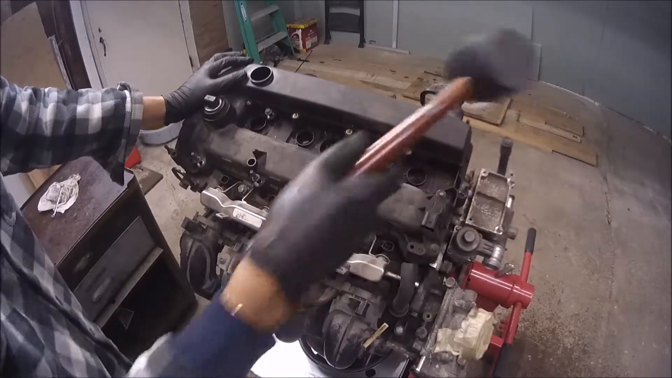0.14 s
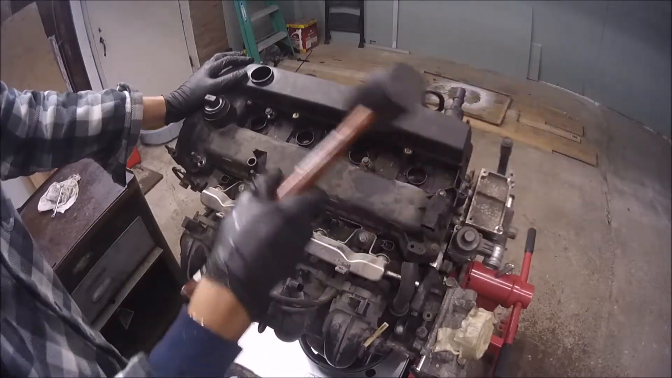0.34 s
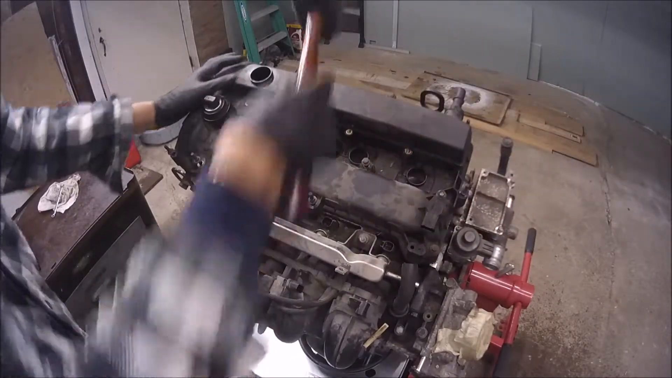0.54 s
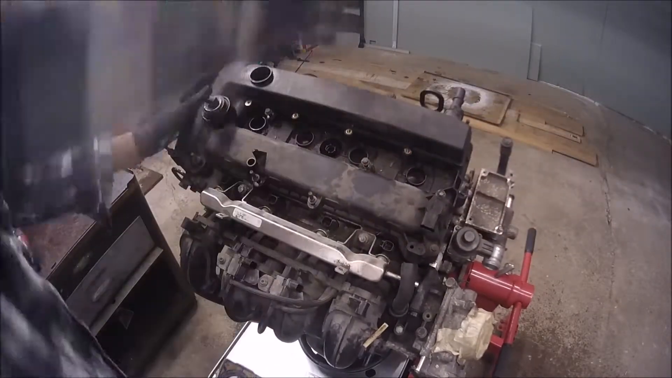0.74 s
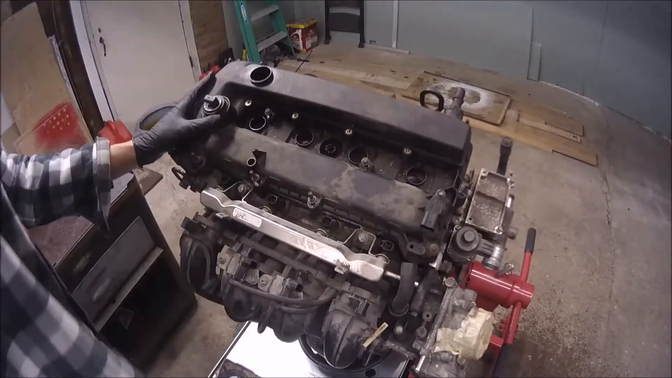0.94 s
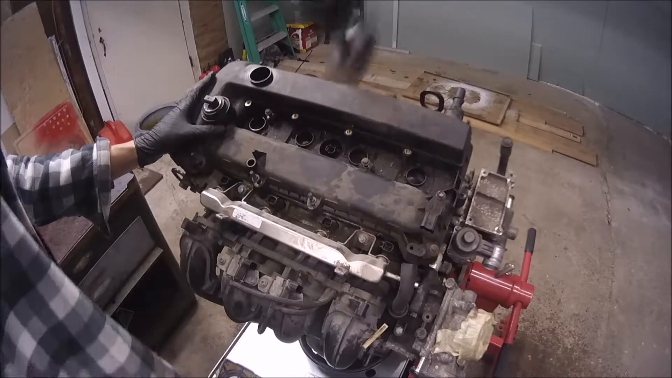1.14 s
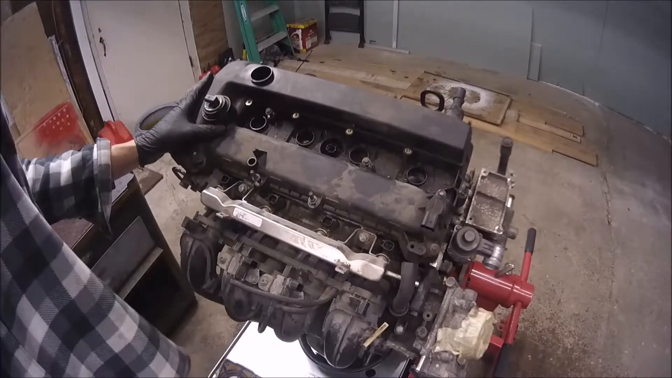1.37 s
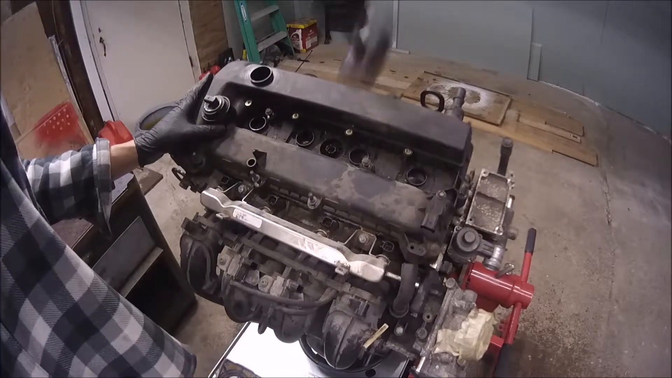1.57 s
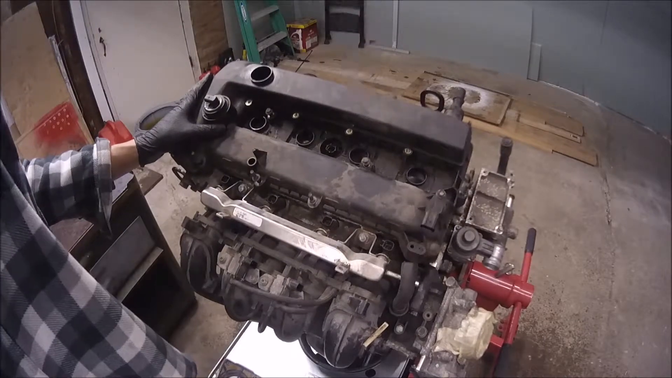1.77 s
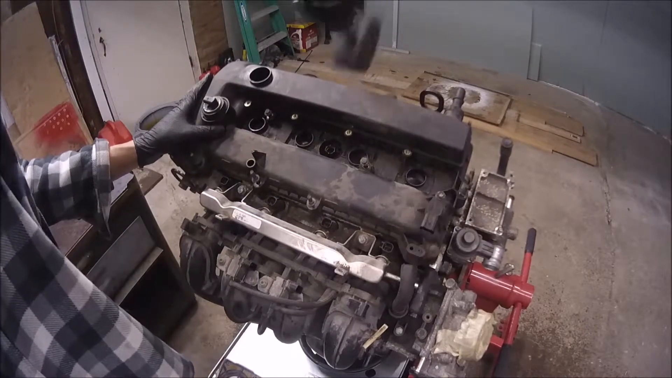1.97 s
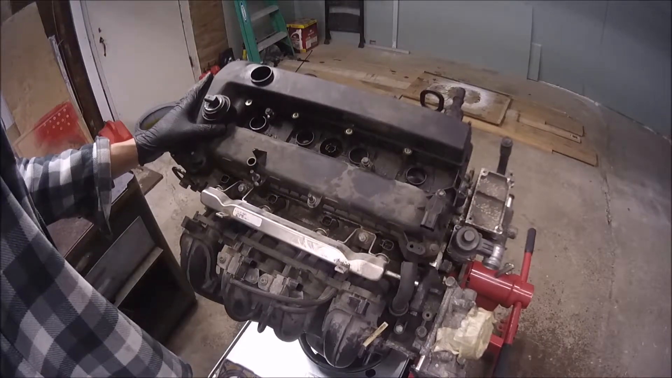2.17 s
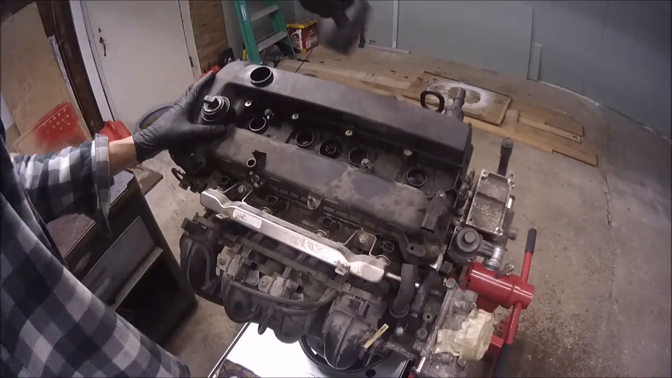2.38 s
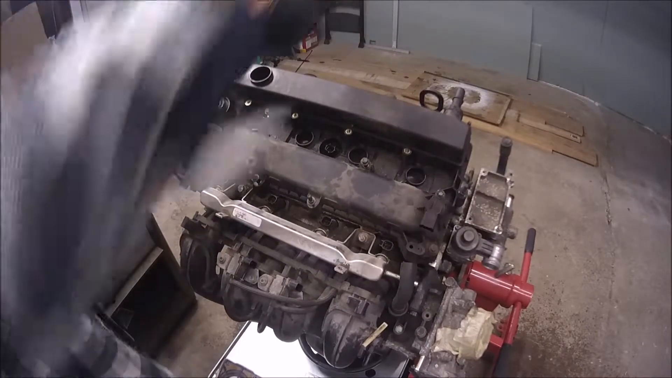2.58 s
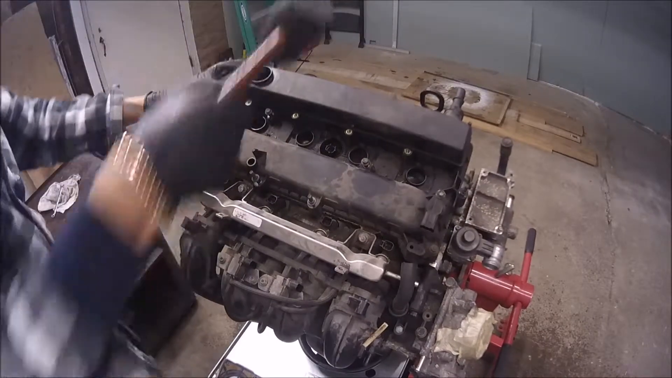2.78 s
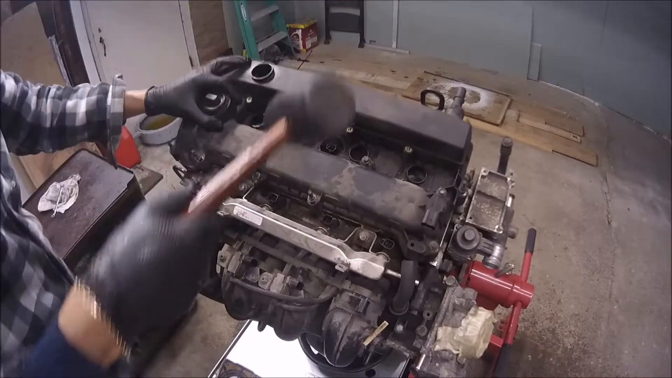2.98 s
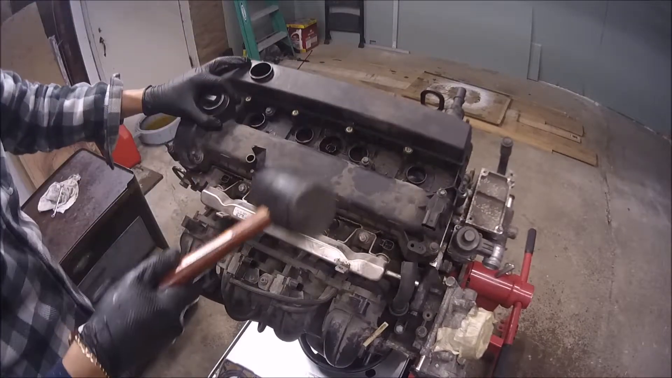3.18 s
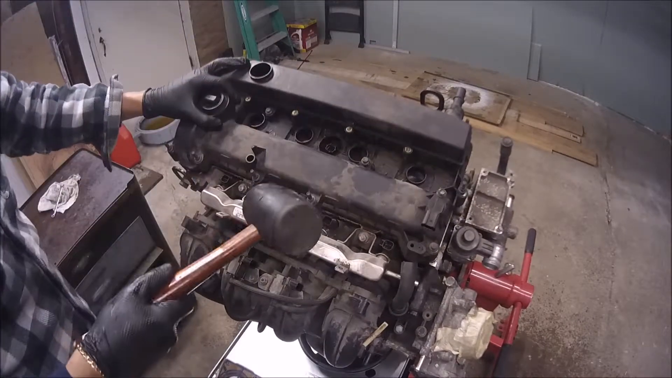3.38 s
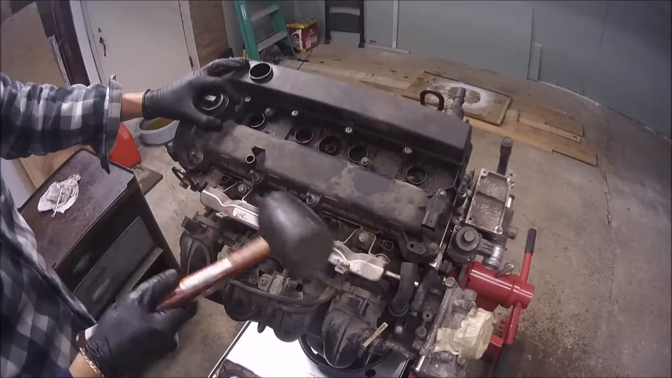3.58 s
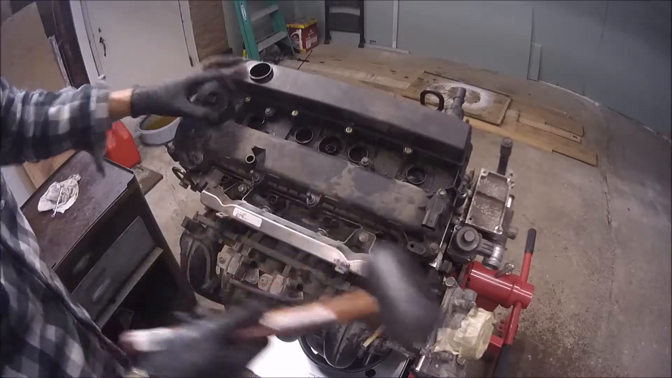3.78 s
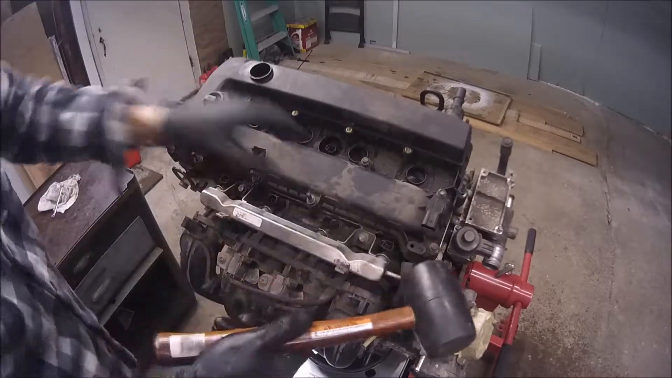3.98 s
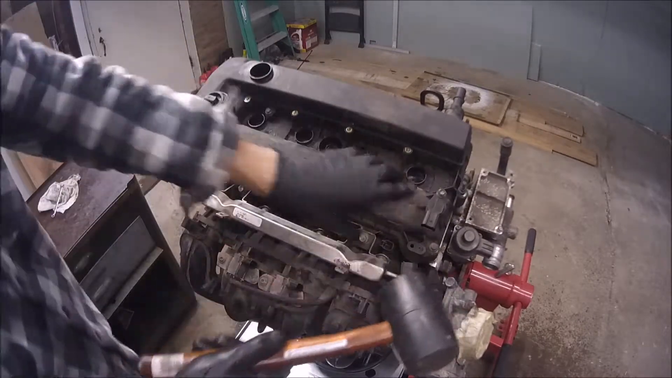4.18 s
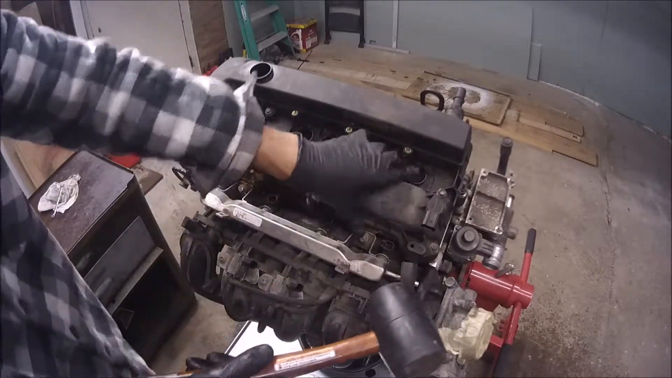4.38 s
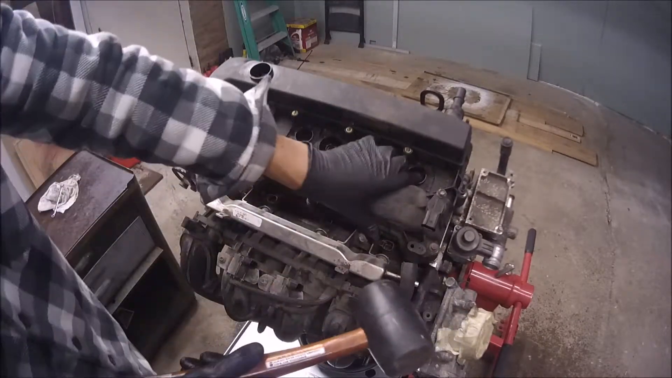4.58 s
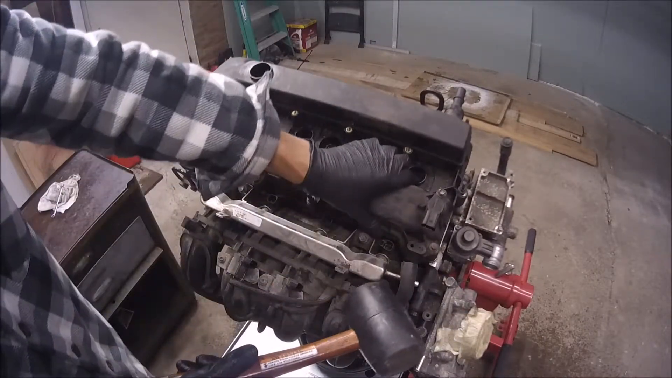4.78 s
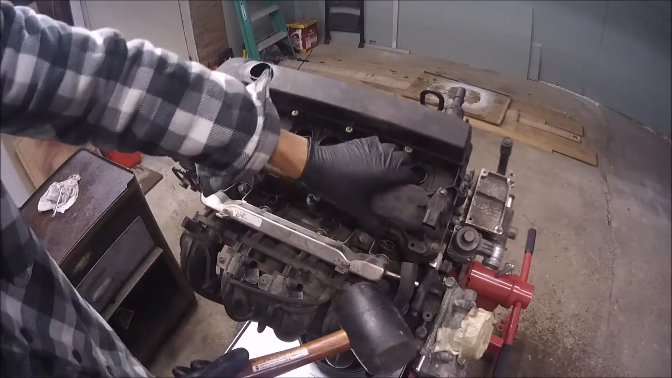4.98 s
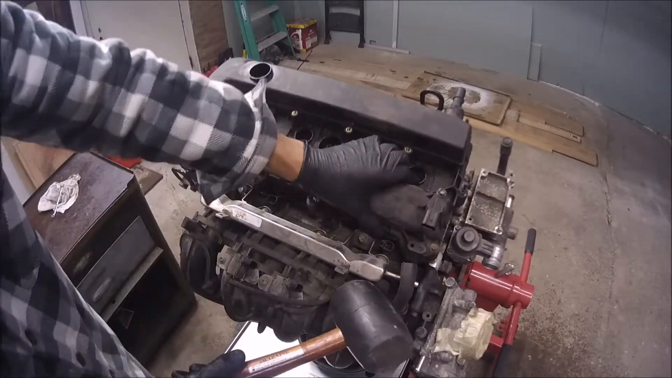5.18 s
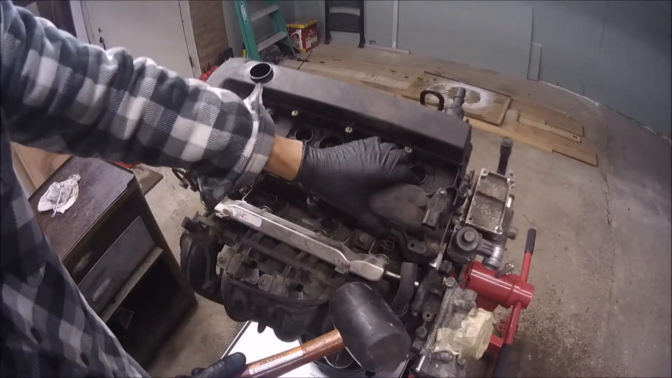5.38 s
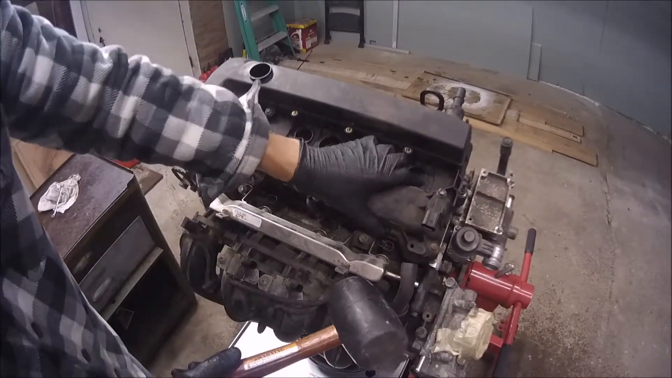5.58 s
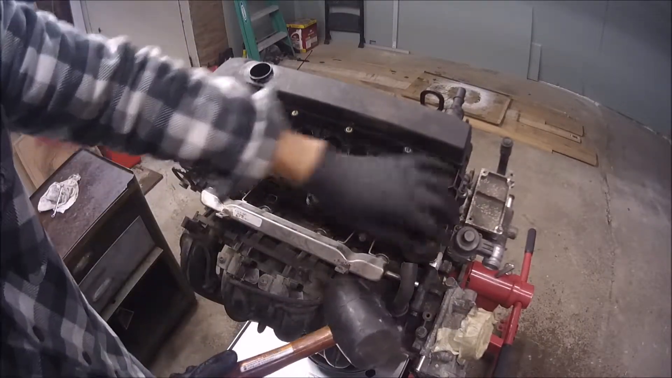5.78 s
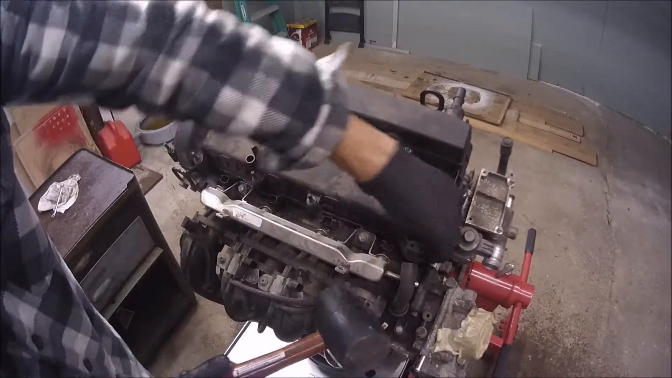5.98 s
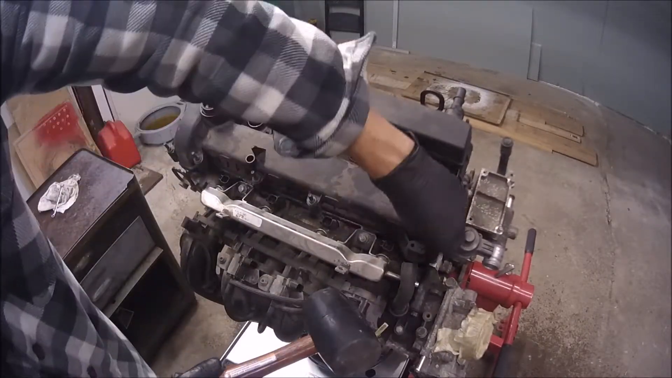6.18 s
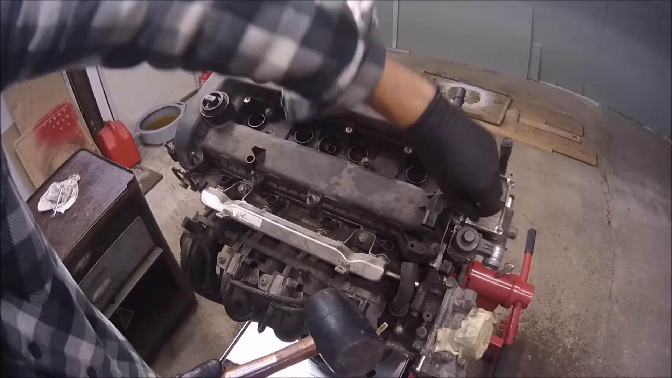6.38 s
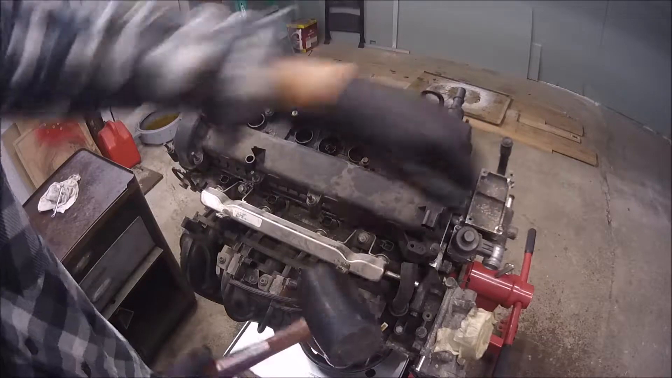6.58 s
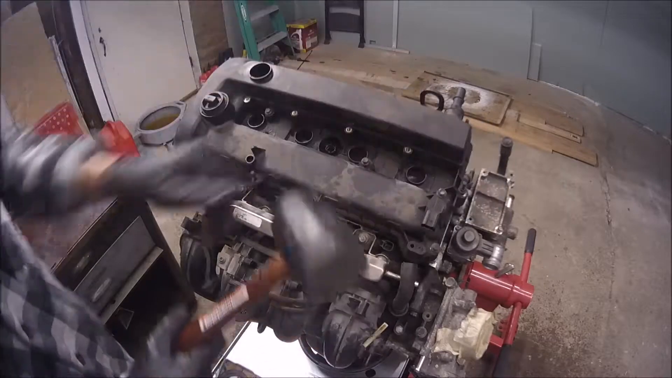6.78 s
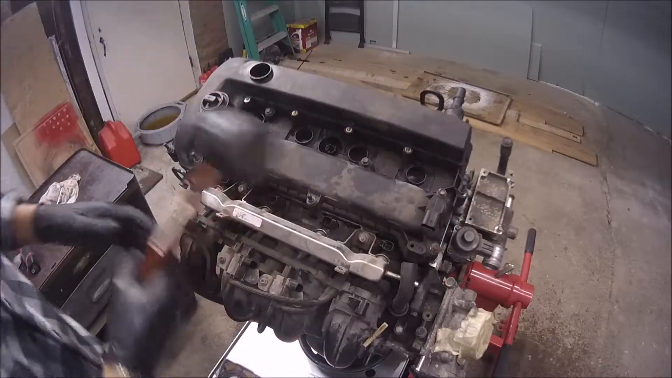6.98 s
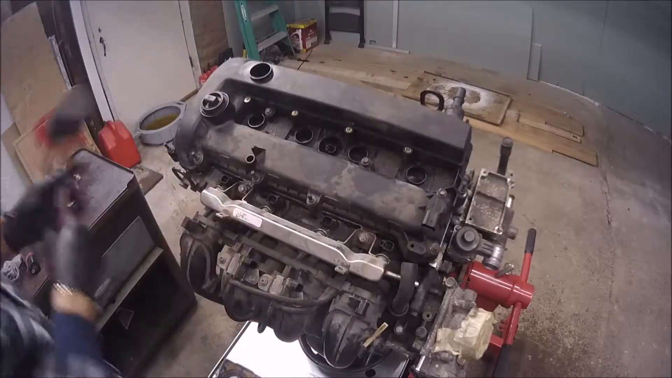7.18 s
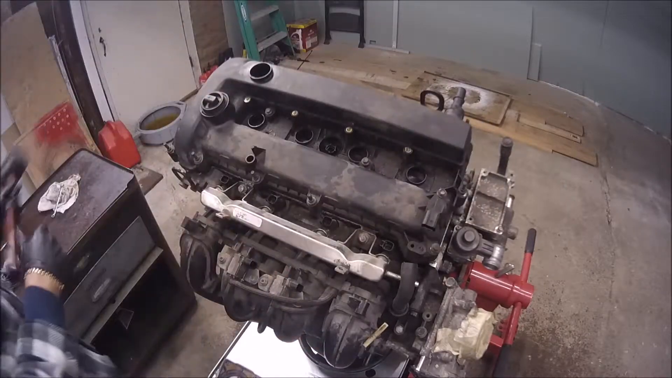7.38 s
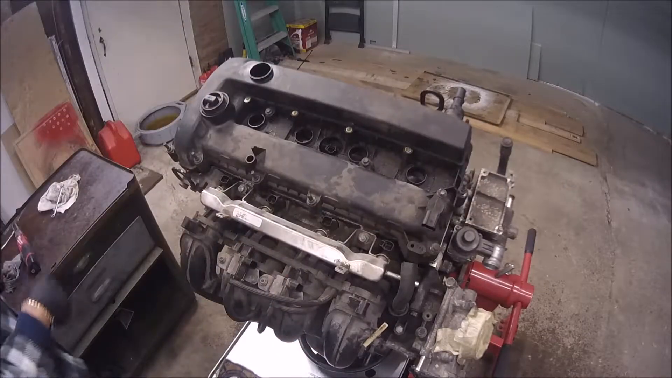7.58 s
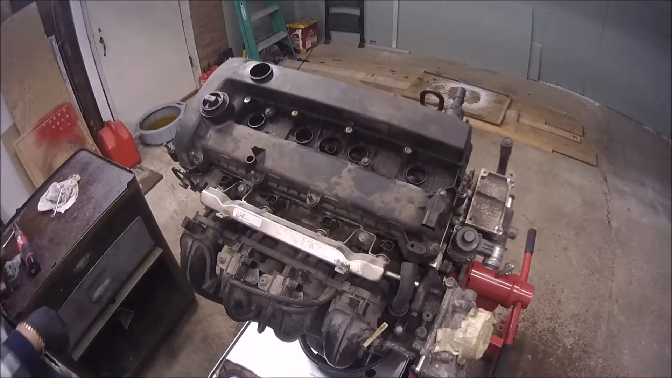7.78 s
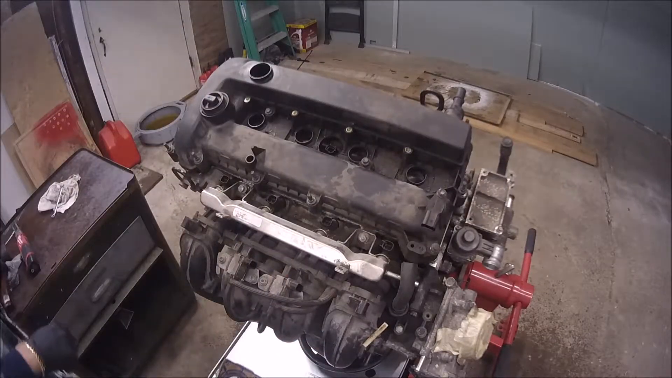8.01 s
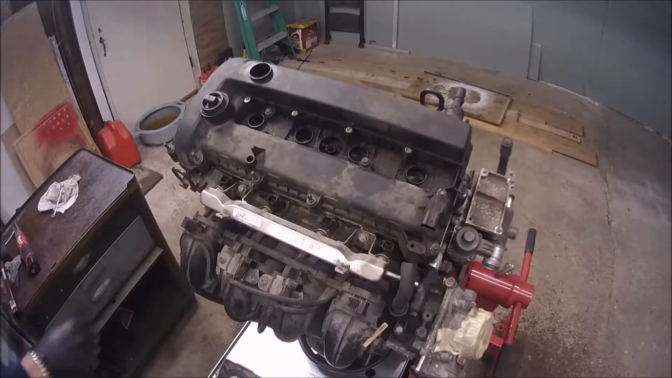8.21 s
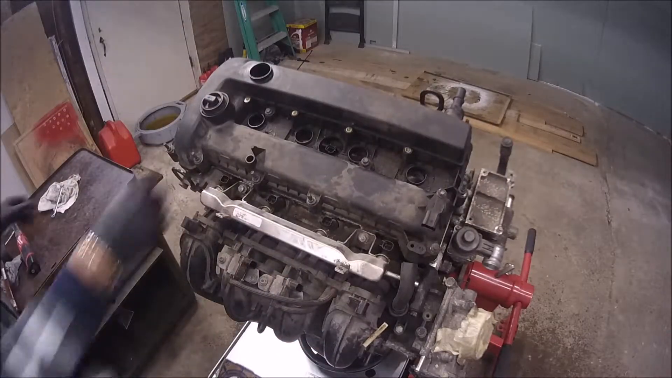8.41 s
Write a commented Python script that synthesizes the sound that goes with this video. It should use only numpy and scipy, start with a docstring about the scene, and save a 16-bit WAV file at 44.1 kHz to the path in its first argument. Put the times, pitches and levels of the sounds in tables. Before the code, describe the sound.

Close by in a bare, echoing garage, a rubber mallet strikes a metal engine cover four times in quick succession. Each blow thumps, rings and rattles, overloading the microphone. A sharp clack follows, then a gloved hand rocks the loosened cover, which clicks and clatters. Sleeves rustle softly, and the mallet is put down on a cabinet with a clunk.

```python
"""Mallet on a valve cover

A rubber mallet strikes an engine's metal valve cover four times, close by, in a bare garage. Each blow
thumps, rings the cover and rattles it on its seat, overloading the microphone and ducking its gain.
Then a gloved hand rocks the loosened cover, which clicks and clatters. Sleeves rustle, and the mallet
is put down on a cabinet with a clunk."""
import sys
import numpy as np
from scipy import signal
from scipy.fft import rfft, irfft, next_fast_len
from scipy.io import wavfile
from scipy.ndimage import uniform_filter1d, minimum_filter1d

SR = 44100
rng = np.random.default_rng(int(sys.argv[2]) if len(sys.argv) > 2 else 0)


def master_out(mix):
    """Clip the mix to full scale and print it as 16-bit PCM to the path in sys.argv[1]."""
    frames = np.transpose(np.atleast_2d(mix))
    ceiling = np.clip(frames, -1, 1)
    pcm = np.round(ceiling * 32767).astype(np.int16)
    wavfile.write(sys.argv[1], SR, pcm)


N = 372644
TIME = np.arange(N) / SR
AGE = TIME[:SR * 2 // 5]   # seconds since a contact

# Colour of the hiss bed. Each row: frequency in Hz, density in dB.
HISS_COLOUR = [(18, -58), (30, -30), (92, -15), (312, -11), (426, -7), (953, -4.5), (1110, -8.5),
               (1370, -7), (2190, -10), (6700, -14), (7830, -15), (15000, -15.5)]
# The garage's reverb. Each row: frequency in Hz, level in dB, t60 in seconds.
GARAGE_REVERB = [(60, -13.5, 0.4), (129, -10, 0.4), (276, -1.5, .6), (600, -1.5, 0.59), (1090, 0, 0.55),
                 (2520, -1, 0.61), (5000, -1, 0.57), (9700, -4, 0.43), (14000, -8.5, .26)]
# Colour of rubbing cloth. Each row: frequency in Hz, density in dB.
CLOTH_COLOUR = [(80, -10), (300, 4), (1500, 0.5), (3000, -0.5), (6500, -3), (9500, 2), (12000, -7.5),
                (16000, -11.5)]
# Fader curves for the sleeve (lifting the mallet, reaching for the cover, drawing back) and for a dull
# scrape at the cabinet. Each row: time in seconds, level in dB.
SLEEVE_LIFT = [(0.42, -61), (0.558, -51), (0.646, -55.5), (0.674, -40.5), (0.892, -60.5), (0.95, -52.5),
               (0.996, -64), (1.026, -54.5), (1.17, -60)]
SLEEVE_REACH = [(4.2, -70), (4.258, -40.5), (4.306, -55), (4.526, -51), (4.558, -68), (4.624, -52.5),
                (4.72, -61.5)]
SLEEVE_BACK = [(7.14, -73), (7.178, -57), (7.19, -47), (7.512, -65.5), (7.6, -65)]
CABINET_SCRAPE = [(7.74, -60), (7.766, -74), (7.782, -55), (7.922, -41.5), (8.1, -67), (8.18, -58)]
# Brief slips of the glove. Each row: midpoint in seconds, level in dB, pitch in Hz.
GLOVE_SLIPS = [(1.993, -34.5, 6020), (3.042, -41, 2000), (3.818, -44.5, 5000), (4.842, -44, 4100),
               (5.67, -43.5, 5500), (5.922, -44.5, 5074), (7.176, -46, 5700), (7.238, -48.5, 2610),
               (7.91, -40.5, 1900)]
# The cabinet's panel modes. Each row: frequency in Hz, level in dB.
CABINET_MODES = [(113, -2.5), (150, -2.5), (250, -4.5), (515, 1), (690, -28), (781, -15), (1730, -11)]
# Bumps on the cabinet. Each row: start in seconds, level in dB, contact cut-off in Hz.
CABINET_BUMPS = [(0.008, -31, 2500), (7.890, -35, 150), (7.899, -29, 120), (7.946, -34.5, 151),
                 (7.99, -37.5, 170), (8.07, -45.5, 202), (8.193, -37, 2000)]
# The mallet lands on the cabinet: start in seconds, level in dB, t60 in seconds, reverb send in dB.
MALLET_CLUNK = (8.1895, -16.5, 0.165, 7.5)
# Colour of that clunk. Each row: frequency in Hz, density in dB.
CLUNK_COLOUR = [(100, -15), (250, -15), (480, -2.5), (750, -0.5), (1050, -5), (1350, 1.5), (1750, -3),
                (2200, -7.5), (2700, -15.5), (4000, -18.5), (6000, -26), (10000, -28), (15000, -42)]
# The valve cover's modes. Each row: frequency in Hz, level in dB.
COVER_MODES = [(180, -17), (255, -18.5), (285, -14.5), (413, -16), (490, -14.5), (580, -5.5), (640, -10),
               (785, -10.5), (888, -9), (910, -4.5), (1055, -5.5), (1112, -5), (1281, -10), (1789, -11),
               (1874, -8), (2046, -10), (2198, -11.5), (2760, -8.5), (3720, -13), (3930, -11.5),
               (4525, -14.5), (5394, -11.5)]
# Mallet and cover knock on the engine. Each row: start in seconds, level in dB, pitch in Hz, crack in dB.
ENGINE_KNOCKS = [(0.008, -13, 310, -3), (0.012, -13, 1490, 0), (0.074, -23, 3850, -15),
                 (0.635, -33.5, 2170, -18), (0.661, -42, 317, -18), (2.784, -20, 2500, -4.5),
                 (3.0589, -3.5, 1160, -3.5), (3.067, -14.5, 4000, -2), (3.779, -39, 900, -11.5),
                 (3.869, -29.5, 1300, -7), (4.868, -31, 1190, -20), (4.883, -20.5, 1580, -7),
                 (4.895, -25, 573, -24), (4.9241, -21.5, 1150, -12.5), (5.0815, -34, 700, -23),
                 (5.1598, -29.5, 1650, -10), (5.2414, -29.5, 900, -8), (5.297, -29, 1240, -10),
                 (5.555, -31, 480, -17), (6.2359, -29.5, 1320, -11), (6.259, -12, 3100, -13),
                 (6.266, -17.5, 1080, -1.5), (6.2813, -7.5, 1012, -3.5), (6.3217, -11.5, 1085, 5)]
# The cover rocks. Each row: start in seconds, level in dB, seat pitch in Hz, crack in dB.
COVER_ROCKS = [(4.257, -21.5, 770, -16), (4.348, -22.5, 780, -25), (4.4319, -22.5, 806, -22),
               (5.5641, -19, 1060, -17), (5.933, -17, 1030, -8.5)]
# Thin, bright ticks, most in a downswing. Each row: start in seconds, level in dB.
BRIGHT_TICKS = [(0.764, -48), (0.784, -46), (1.179, -41.5), (1.201, -33.5), (1.209, -33), (1.6205, -25),
                (1.629, -21), (1.6454, -28), (4.742, -45.5)]
# A small steel part pings: start in seconds, level in dB, pitch in Hz, t60 in seconds.
STEEL_PING = (3.066, -20, 13140, .13)
# Colour of the cover's dense rattle on its seat. Each row: frequency in Hz, density in dB.
RATTLE_COLOUR = [(60, -31), (140, -6.5), (250, -8.5), (550, -3.5), (1050, 2.5), (1500, -3.5), (2100, -2.5),
                 (3200, -6.5), (5200, -7), (7000, -11.5), (9500, -6.5), (12000, -18.5), (16000, -26)]
# Mallet blows. Each row: start in seconds, level in dB, rattle t60 in seconds, relative thump in dB.
MALLET_BLOWS = [(1.2173, 16.5, 0.1, -11), (1.6534, 16, 0.1, -5.5), (2.0224, 15.5, .075, -18),
                (2.3307, 11.5, 0.081, -26.5)]


def from_db(db):
    """Decibels to gain."""
    return 10 ** (np.asarray(db) / 20)


def at_hz(points, hz, column=1):
    """One column of a table, read on a log-frequency axis."""
    points = np.array(points)
    return np.interp(np.log(hz + 1e-9), np.log(points[:, 0]), points[:, column])


def fade(t60, age=AGE):
    """Exponential decay, 60 dB down after t60 seconds."""
    return np.exp(-np.log(1000) * age / max(t60, 1e-3))


def noise(colour, size):
    """Coloured noise of rms 1."""
    length = next_fast_len(size)
    gains = from_db(at_hz(colour, np.fft.rfftfreq(length, 1 / SR)))
    x = irfft(rfft(rng.standard_normal(length)) * gains, length)[:size]
    return x / x.std()


def passed(x, hz, kind, order=2):
    """Causal Butterworth filter."""
    sos = signal.butter(order, np.clip(hz, 10, .45 * SR), kind, fs=SR, output="sos")
    return signal.sosfilt(sos, x + 1e-18)


def add(track, s, sound):
    """Drops a sound onto a track at s seconds."""
    start = max(round(s * SR), 0)
    track[start:start + len(sound)] += sound[:N - start]


def ring(modes, spread_db):
    """Struck modes, the high ones dying first; each contact point gives them new strengths and signs."""
    gains = from_db(spread_db * rng.standard_normal(len(modes))) * rng.choice([-1, 1], len(modes))
    return sum(gain * from_db(db) * np.sin(2 * np.pi * hz * AGE) * fade(.11 * (hz / 1000) ** -.4)
               for gain, (hz, db) in zip(gains, modes))


def burst(low_hz, high_hz, t60):
    """A noise hit, like a cluster of heavily damped modes, starting at rms 1."""
    envelope = fade(t60)
    x = passed(rng.standard_normal(len(AGE)) * envelope, [low_hz, high_hz], "band", order=3)
    return x * np.sqrt(np.sum(envelope ** 2) / np.sum(x ** 2))


def all_round(x, smooth_bins=121):
    """What a large body radiates in all directions: the fine dips of any one direction even out."""
    spectrum = rfft(x)
    power = np.abs(spectrum) ** 2 + 1e-12
    even = irfft(spectrum * np.sqrt(np.abs(uniform_filter1d(power, smooth_bins)) / power), len(x))
    return even * np.clip(1 - (AGE / AGE.mean()) ** 2, 0, 1)


def hiss(level_db=-53.5):
    """A faint, steady bed of hiss."""
    return from_db(level_db) * noise(HISS_COLOUR, N)


def garage(x, first_echo_s=.0022, build_s=.0068):
    """Diffuse echoes build up after the first wall and die faster in the top end."""
    age, hz = TIME[:SR], np.fft.rfftfreq(SR, 1 / SR)
    echoes = rfft(rng.standard_normal(SR)) * from_db(at_hz(GARAGE_REVERB, hz))
    edges, tail = np.geomspace(30, SR / 2, 36), 0
    for low, high in zip(edges, edges[1:]):
        t60 = at_hz(GARAGE_REVERB, np.sqrt(low * high), column=2)
        tail = tail + irfft(echoes * ((hz >= low) & (hz < high)), SR) * fade(t60, age)
    build_up = np.clip((age - first_echo_s) / build_s, 0, 1)
    tail *= build_up / np.sqrt(np.sum(fade(.56, age) ** 2))
    return signal.fftconvolve(x, tail)[:N]


def rub(hz, size, grain_db=3.5, grain_hz=160):
    """A grainy swish around one pitch: the surfaces slip in tiny, uneven catches."""
    swish = passed(noise(CLOTH_COLOUR, size), [hz / 2, hz * 2], "band", order=1)
    catches = passed(rng.standard_normal(size), grain_hz, "low")
    return swish / swish.std() * from_db(grain_db * catches / catches.std())


def rubbing(slip_sigma_s=.011):
    """Sleeve and scrape follow the arm's moves; each slip of the glove swells and fades."""
    out, middle = np.zeros(N), AGE.mean()
    for curve, hz, trim_db in [(SLEEVE_LIFT, 3650, 0), (SLEEVE_REACH, 5500, 0),
                               (SLEEVE_BACK, 3810, 0), (CABINET_SCRAPE, 1400, 1)]:
        fader_db = np.interp(TIME, *np.transpose(curve), left=-np.inf, right=-np.inf)
        out += rub(hz, N) * from_db(trim_db + fader_db)
    swell = np.exp(-((AGE - middle) / slip_sigma_s) ** 2 / 2)
    for s, db, hz in GLOVE_SLIPS:
        add(out, s - middle, from_db(db) * swell * rub(hz, len(AGE)))
    return out


def cabinet(thud_db=-5):
    """Soft bumps thud, hard ones ring all panels, the mallet clunks down. Returns direct and send."""
    bumps, clunk = np.zeros(N), np.zeros(N)
    for s, db, cut_hz in CABINET_BUMPS:
        panels = passed(ring(CABINET_MODES, spread_db=5), cut_hz, "low")
        thud = from_db(thud_db) * burst(90, 190, t60=.07)
        add(bumps, s, from_db(db) * (panels + thud))
    bumps = passed(bumps, 70, "high", order=6)   # thin panels radiate no deep bass
    s, db, t60, send_db = MALLET_CLUNK
    add(clunk, s, from_db(db) * noise(CLUNK_COLOUR, len(AGE)) * fade(t60))
    clunk = passed(clunk, 220, "high")
    return bumps + clunk, bumps + from_db(send_db) * clunk


def touch(hz, t60, crack_db, hollow_db, width=1.94, tone_db=-3, hollow_hz=350):
    """One contact, layered: a pitched clack, a bright crack, a hollow body and a faint cover ring."""
    tone = from_db(tone_db) * np.sin(2 * np.pi * hz * AGE) * fade(25 / hz)   # rings for 25 cycles
    clack = burst(hz / width, hz * width, t60) + tone
    top_hz = 10800 * 2 ** (crack_db / 30)   # a stronger crack reaches higher
    crack = from_db(crack_db) * burst(2200, top_hz, t60)
    hollow = from_db(hollow_db) * burst(hollow_hz / 1.25, hollow_hz * 1.25, t60=.033)
    cover = from_db(-28) * ring(COVER_MODES, spread_db=2)
    return passed(clack + crack + hollow + cover, 180, "high")


def contacts(bounce_s=.008, bounce_db=-9.5, rim_hz=2090, drop_s=.002946, drop_db=-8):
    """Knocks bounce once, rocks clack and drop, ticks come singly. Yields start, dB, send dB, sound."""
    for s, db, hz, crack_db in ENGINE_KNOCKS:
        t60 = .025 * 2 ** ((db + 20.5) / 30)   # harder knocks ring longer
        hollow_db = -16 - .35 * (db + 20)   # and sound less hollow
        yield s, db, 0, touch(hz, t60, crack_db, hollow_db)
        yield s + bounce_s * rng.uniform(.65, 1.35), db + bounce_db, 0, touch(hz, t60, crack_db, hollow_db)
    for s, db, seat_hz, crack_db in COVER_ROCKS:   # the rim clacks, then drops back on its seat
        rim = touch(rim_hz, .02, crack_db, hollow_db=-27, width=1.85, tone_db=-1.5)
        yield s, db, -2.5, rim
        seat = touch(seat_hz, .02, crack_db, hollow_db=-27, width=1.26, tone_db=-1)
        yield s + drop_s, db + drop_db, -2.5, seat
    for s, db in BRIGHT_TICKS:
        yield s, db, 2, touch(hz=4500, t60=.022, crack_db=7, hollow_db=-22)


def clatter(puff_db=-34):
    """All the light contacts, plus a dry steel ping. Returns direct and send."""
    direct, send = np.zeros(N), np.zeros(N)
    for s, db, send_db, sound in contacts():
        puff = from_db(puff_db + db) * burst(25, 140, t60=.03)   # pushed air, heard on hard knocks
        add(direct, s, from_db(db) * (sound + puff))
        add(send, s, from_db(db + send_db) * passed(all_round(sound), 180, "high"))
    s, db, hz, t60 = STEEL_PING
    add(direct, s, from_db(db) * np.sin(2 * np.pi * hz * AGE) * fade(t60))
    return direct, send


def mallet(ring_db=-11, thump_hz=150, thump_t60=.025, seat_lag_s=.0008, wet_db=-3.5):
    """The rubber head thumps and rings the cover, which at once rattles hard against its seat."""
    out = np.zeros(N)
    for s, db, t60, thump_db in MALLET_BLOWS:
        cover = from_db(ring_db) * ring(COVER_MODES, spread_db=1)
        rattle = noise(RATTLE_COLOUR, len(AGE)) * fade(t60) * (AGE > seat_lag_s)
        thump = from_db(thump_db) * np.sin(2 * np.pi * thump_hz * AGE) * fade(thump_t60)
        direct = passed(cover + rattle, 170, "high", order=4) + passed(thump, 110, "high")
        # the arm and the striking spot move, so every blow meets its own pattern of echoes
        echoes = garage(passed(cover + all_round(rattle), 160, "high", order=4))
        add(out, s - seat_lag_s, from_db(db) * direct)
        add(out, s - seat_lag_s, from_db(db + wet_db) * echoes)
    return out


def scene(reverb_db=-2.5):
    """The mono mix: every source up close, with the garage around it."""
    touches, touches_send = clatter()
    panels, panels_send = cabinet()
    cloth = rubbing()
    room = from_db(reverb_db) * garage(touches_send + panels_send + cloth)
    return (hiss() + room + cloth + panels + touches + mallet())[None]


def gain_control(x, threshold_db=1, most_db=11, attack_s=.01, hold_s=.7, release_db_per_s=10):
    """Loud peaks duck the gain within milliseconds; it holds for a while, then creeps back."""
    over_db = np.clip(20 * np.log10(np.abs(x) + 1e-9) - threshold_db, 0, most_db)
    half = int(hold_s * SR / 2)
    held_db = -minimum_filter1d(-over_db, 2 * half + 1, origin=half, mode="constant")
    release_db = release_db_per_s * TIME
    cut_db = np.maximum.accumulate(held_db + release_db, axis=-1) - release_db
    pole = np.exp(-1 / (attack_s * SR))
    return x * from_db(-signal.lfilter([1 - pole], [1, -pole], cut_db))


def record(dry):
    """The microphone has a narrow notch; gain control comes too late for the attacks, which clip."""
    ceiling, cutoff_hz = .88, 15400
    ducked = gain_control(passed(dry, [7600, 8300], "bandstop"))
    clipped = ducked / (1 + (ducked / ceiling) ** 8) ** (1 / 8)
    high_cut = signal.ellip(12, .1, 80, cutoff_hz, fs=SR, output="sos")
    return signal.sosfilt(high_cut, clipped)


dry = scene()
out = record(dry)
master_out(out)
```